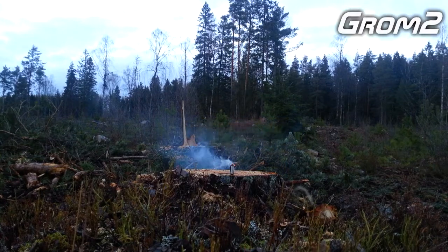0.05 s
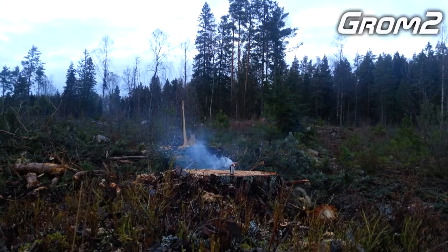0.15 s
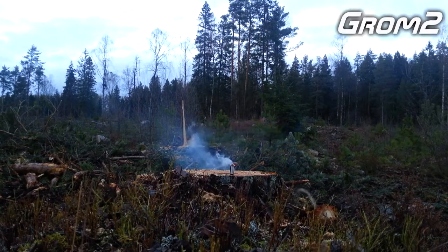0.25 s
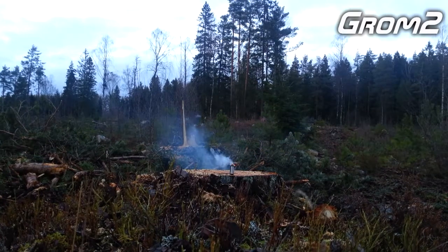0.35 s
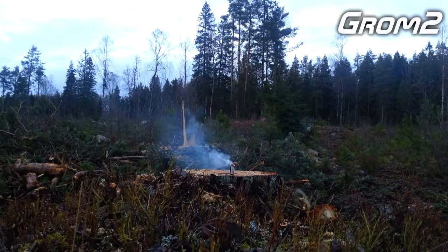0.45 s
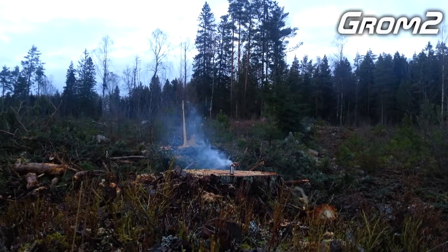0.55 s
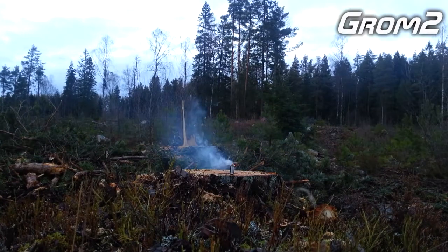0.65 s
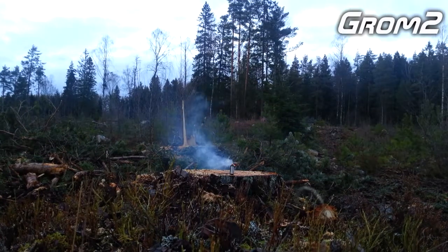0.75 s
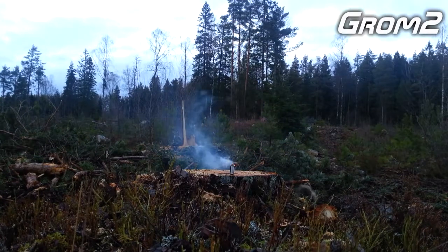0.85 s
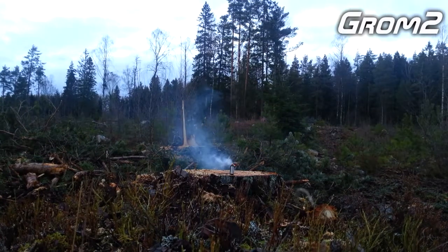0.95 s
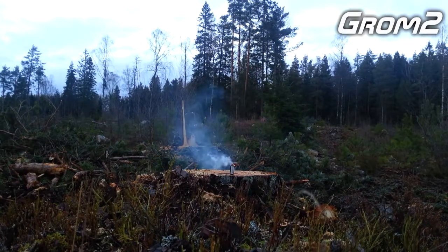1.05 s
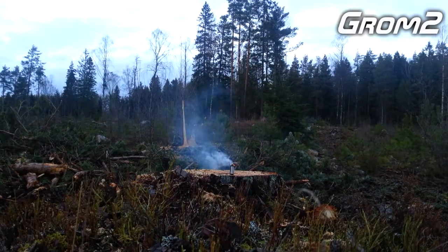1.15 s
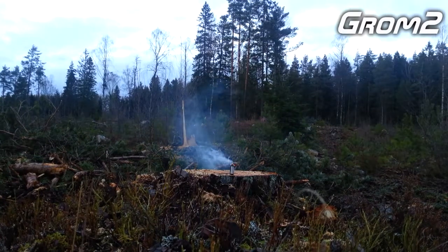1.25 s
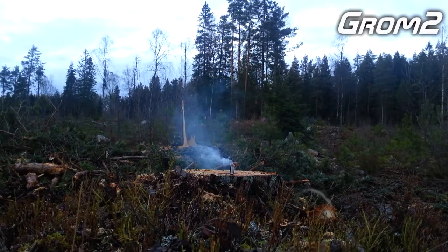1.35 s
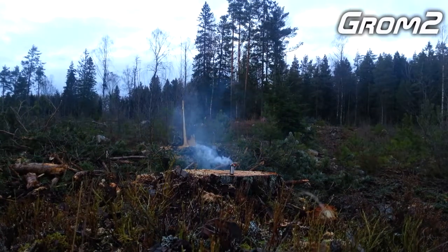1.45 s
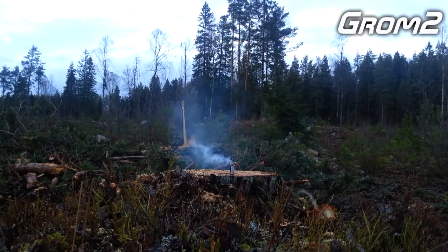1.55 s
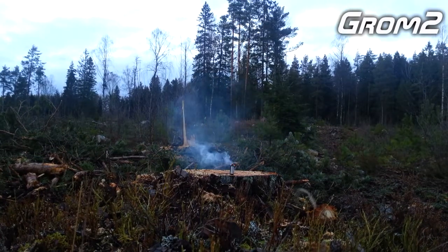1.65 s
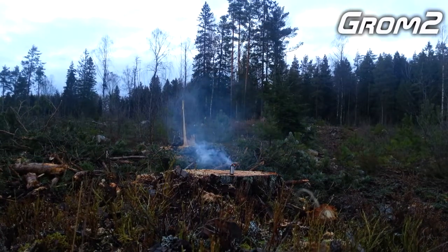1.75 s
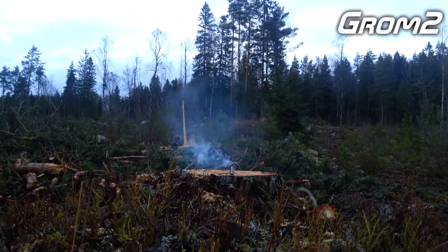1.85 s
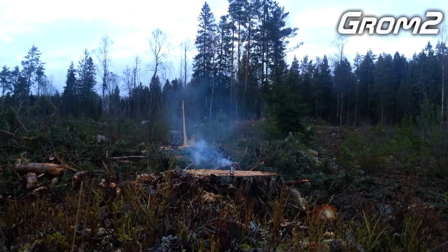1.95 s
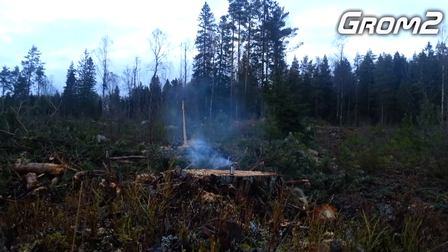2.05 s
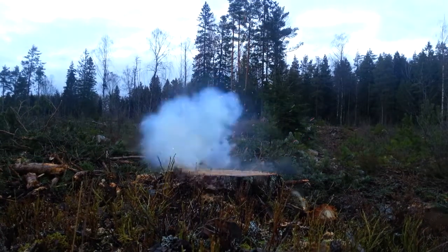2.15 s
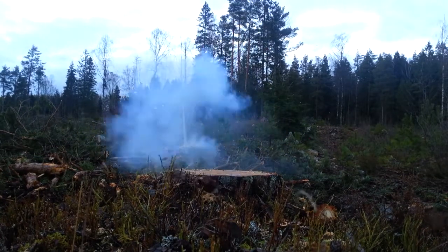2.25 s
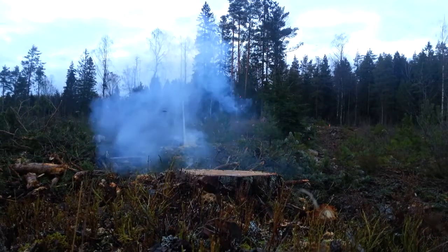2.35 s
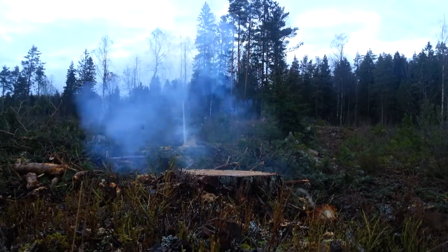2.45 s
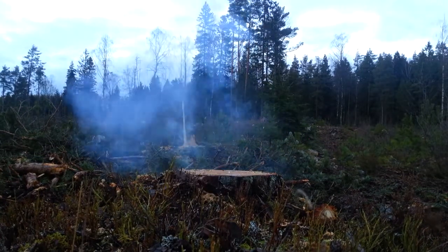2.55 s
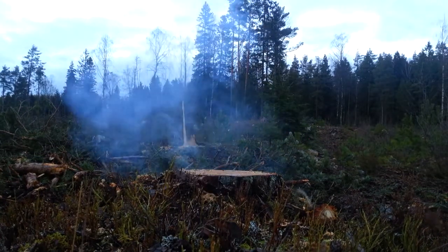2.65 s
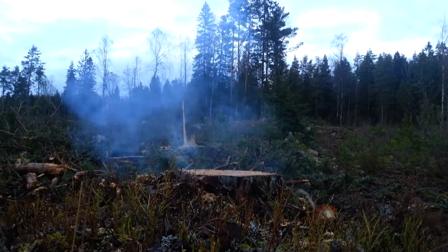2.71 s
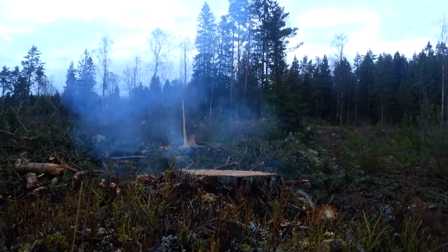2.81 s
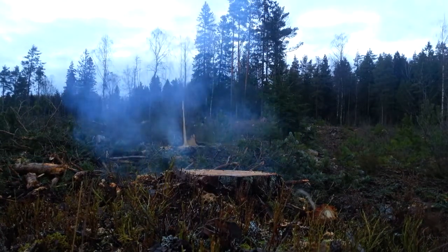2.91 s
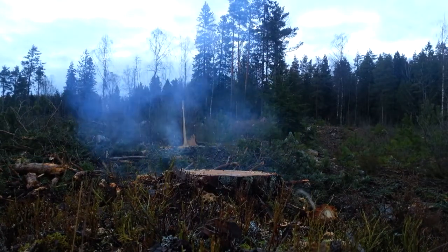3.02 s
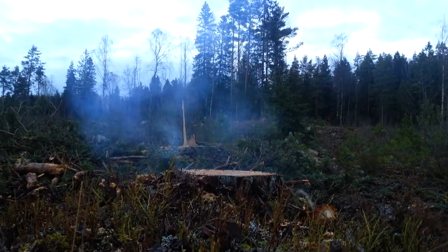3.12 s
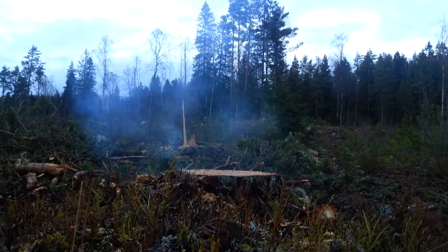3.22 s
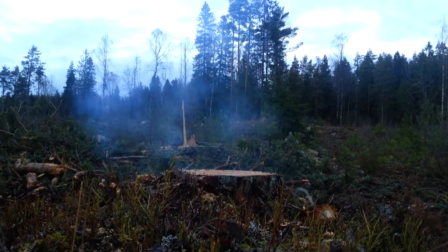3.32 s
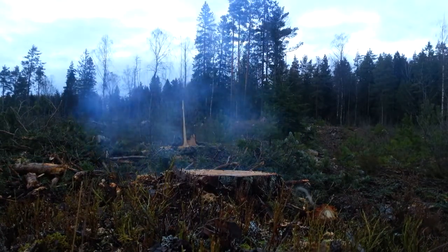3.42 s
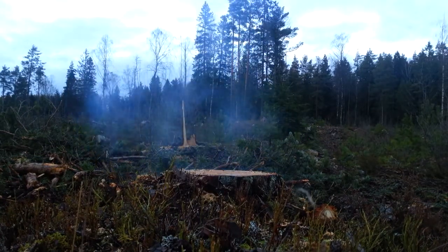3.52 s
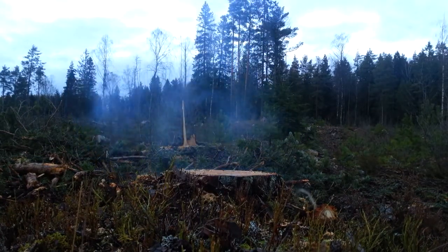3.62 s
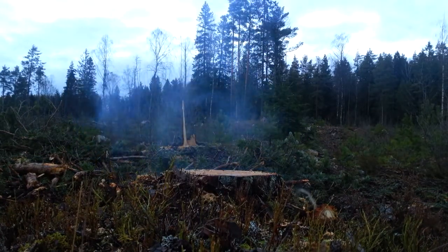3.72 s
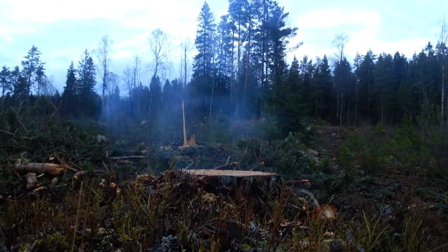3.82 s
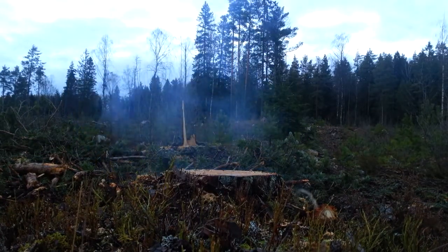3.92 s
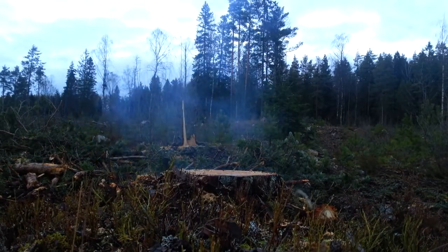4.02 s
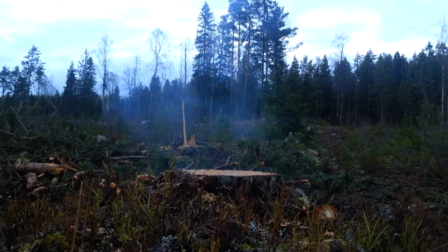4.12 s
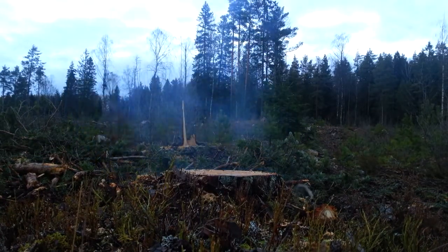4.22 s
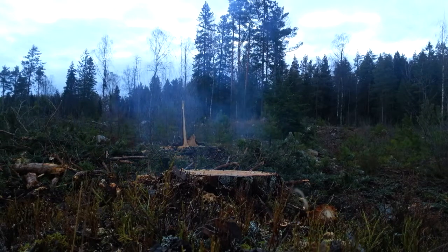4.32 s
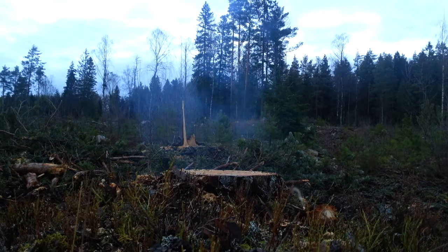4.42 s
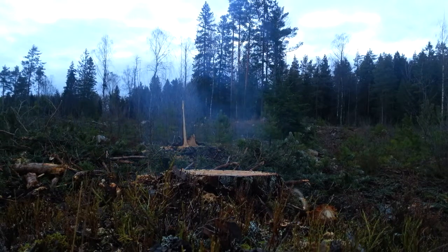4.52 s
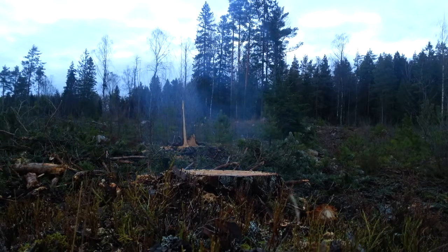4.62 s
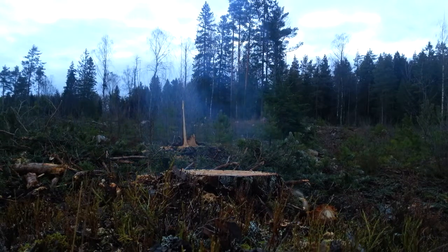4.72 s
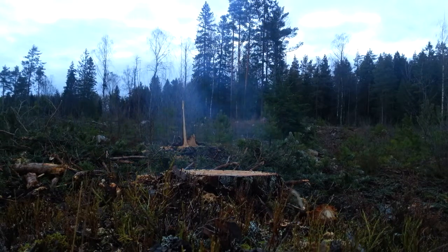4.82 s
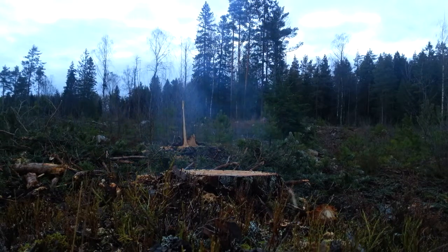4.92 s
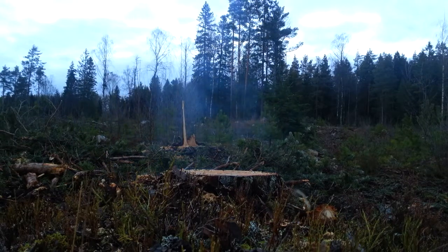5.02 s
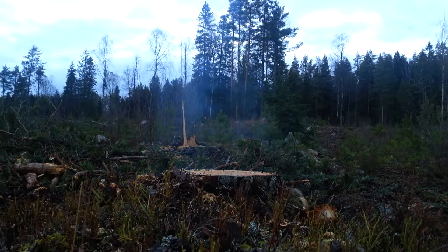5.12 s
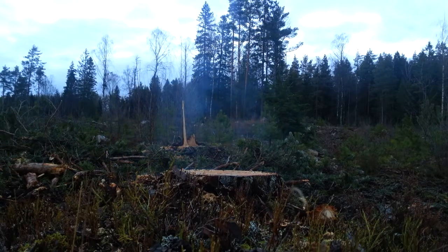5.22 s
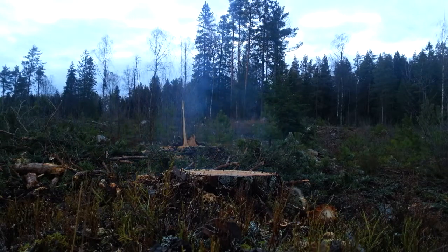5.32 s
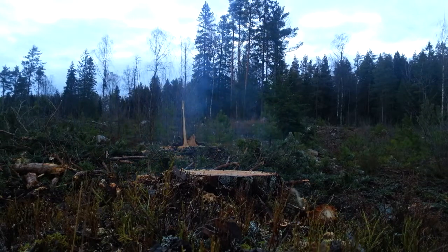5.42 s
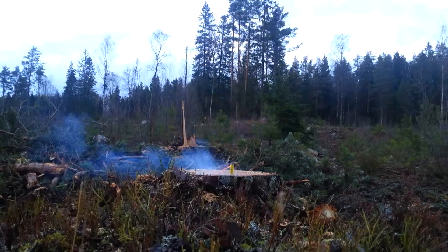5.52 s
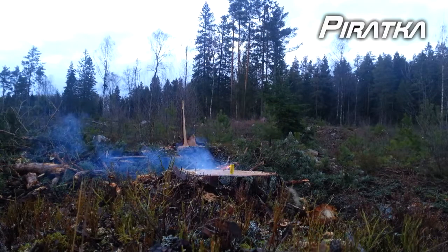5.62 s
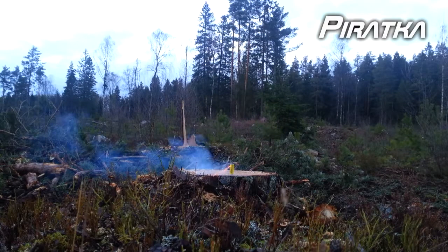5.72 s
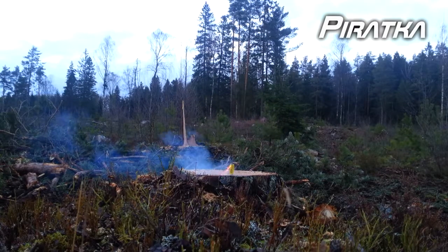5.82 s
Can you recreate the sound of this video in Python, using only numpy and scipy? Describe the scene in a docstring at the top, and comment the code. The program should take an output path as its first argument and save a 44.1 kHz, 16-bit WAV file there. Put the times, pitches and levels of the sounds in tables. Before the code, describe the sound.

A firecracker bangs with violent overload in a forest clearing, its report rolling back from the trees, then a second fuse flares up hissing.

```python
"""A firecracker goes off on a stump in a forest clearing: a shock pulse with noise bursts that overloads two microphones.
Its dull, smouldering fuse is filtered noise with spurts, heard over wind in the trees and amplifier hiss.
The report scatters off felled wood, then rolls back from the trees as noise that grows duller with travel time.
Scraps tick down as short noise bursts, and a second fuse hisses and flares as flickering noise."""
import sys
import numpy as np
from scipy import signal
from scipy.fft import rfft, irfft, next_fast_len
from scipy.io import wavfile
from scipy.ndimage import uniform_filter1d

SR = 44100
rng = np.random.default_rng(int(sys.argv[2]) if len(sys.argv) > 2 else 0)


def int16_out(signal):
    """Quantize to a 16-bit WAV file."""
    q = np.round(np.clip(np.atleast_2d(signal).T, -1, 1) * 32767)
    wavfile.write(sys.argv[1], SR, q.astype(np.int16))


N = 258426
T = np.arange(N) / SR  # time in s
BANG_S = 2.2226

# likeness of left and right in a diffuse field: frequency_hz, correlation
DIFFUSE_LIKENESS = [(60, 0.11), (140, 0.54), (290, 0.78), (640, 0.14), (1000, -0.17), (1450, -0.57),
                    (2400, 0.53), (3200, -0.1), (5000, 0.16), (8000, -0.36)]


def undb(db):
    """Level to amplitude: 20 dB is a factor of ten."""
    return 10 ** (np.asarray(db) / 20)


def at(rows, hz):
    """Piecewise-linear reading of (frequency_hz, value) rows on a log-frequency axis."""
    f, value = np.transpose(rows)
    return np.interp(np.log(hz + 1), np.log(f), value)


def unit(x):
    """Normalisation to an rms of 1."""
    return x / np.sqrt(np.mean(x ** 2))


def noise(spectrum, likeness=0, drive=1):
    """Spectral shaping of white noise, rms 1 at drive 1; the mid-to-side balance sets the channel correlation.

    The spectrum is (frequency_hz, relative_density_db) rows; likeness is one correlation or such rows.
    """
    size = next_fast_len(N + SR // 10)
    hz = np.fft.rfftfreq(size, 1 / SR)
    correlation = at(likeness, hz) if np.ndim(likeness) else likeness
    correlation = np.clip(correlation, -.98, .98)
    mid, side = rfft(drive * rng.standard_normal((2, N)), size)
    mid = mid * np.sqrt((1 + correlation) / 2)
    side = side * np.sqrt((1 - correlation) / 2)
    shape = unit(undb(at(spectrum, hz)))
    return irfft(np.array([mid + side, mid - side]) * shape, size)[:, :N]


def flicker(rate_hz, depth_db):
    """Random amplitude modulation: a gain of rms 1 gliding between random levels, rate_hz times a second."""
    steps = rng.standard_normal(N)
    return unit(undb(depth_db * np.interp(T * rate_hz, np.arange(N), steps)))


def pan(right_db):
    """Interchannel level difference, split evenly between left and right."""
    return undb(np.array([[-right_db], [right_db]]) / 2)


def bursts(rows):
    """Impulsive excitation with exponential decay, from (start_s, level_db, decay_s) rows."""
    return sum(undb(db) * (T >= s) * np.exp(-np.abs(T - s) / decay) for s, db, decay in rows)


def swells(rows, attack_s, release_s):
    """Incoherent addition of powers: (start_s, level_db, hold_s) rows each rise, hold and die away."""
    power = 0
    for s, db, hold in rows:
        rise = np.clip((T - s) / attack_s, 0, 1)
        fall = np.exp(-np.maximum(T - s - attack_s - hold, 0) / release_s)
        power = power + (undb(db) * rise * fall) ** 2
    return np.sqrt(power)


def fade(start_s, linger_s, db_per_s):
    """Reverberant-style decay: a gain that lingers near 1, then bends into a steady fall in dB."""
    age = np.maximum(T - start_s, 0)
    return undb(-db_per_s * (np.hypot(age, linger_s) - linger_s))


def forest_air():
    """Turbulence noise: a soft, far rush of wind in the trees over a low rumble that swells and sinks."""
    # distant air in the forest: frequency_hz, relative_density_db
    rush_spectrum = [(20, -23), (50, -21), (90, -10), (160, -1), (280, 0.5), (450, -1.5), (850, -0.5),
                     (1400, -4.5), (2400, -13), (4500, -20), (6200, -22), (14000, -32)]
    # the low rumble swells and sinks, Gaussian in time, lowest soon after the bang: peak_s, level_db, sigma_s
    rumble_rows = [(1.2, -49.7, 1.4), (5.15, -52, 0.53)]
    rumble_spectrum = [(20, -25), (70, -7.0), (150, 1.5), (220, -2), (400, -13), (2000, -47)]
    rush = noise(rush_spectrum, DIFFUSE_LIKENESS) * flicker(3.01, 1.0) * flicker(27, 0.32)
    rumble_level = sum(undb(db) * np.exp(-((T - s) / sigma) ** 2 / 2) for s, db, sigma in rumble_rows)
    rumble = noise(rumble_spectrum, 0.33) * flicker(11, 1.2) * rumble_level
    return rush * undb(-42) * pan(2.2) + rumble * pan(-6.5)


def fuses():
    """Jet noise of sputtering gas: the first fuse a dull smoulder, the second bright, with low puffs."""
    # the first fuse spits now and then: start_s, level_db
    spurt_rows = [(.14, -49.5), (.78, -48)]
    # the second fuse burns in flares: start_s, level_db, hold_s
    flare_rows = [(5.476, -30.5, 0.11), (5.498, -32, .002), (5.666, -27.5, 0.12)]
    # low puffs as it flares: start_s, level_db, decay_s
    puff_rows = [(5.527, -29.5, 0.0066), (5.675, -23.5, 0.01), (5.703, -30.5, 0.013), (5.732, -32, 0.01),
                 (5.771, -43, 0.024)]
    # gas jet of the second fuse: frequency_hz, relative_density_db
    jet_spectrum = [(100, -26), (300, -5.5), (550, -7), (1100, -6.5), (1700, -4.5), (2700, 0.5), (3600, -1),
                    (4800, -1.5), (6200, -9.5), (9000, -10.5), (14400, -10.5), (15200, -42.5)]
    smoulder_spectrum = [(300, -9), (1200, -2), (2500, 6), (4500, -15.0), (7000, -11), (14000, -30)]
    puff_spectrum = [(50, -20), (130, -10), (220, 1), (450, 2.5), (1000, -14), (3000, -22), (9000, -52)]

    # the first fuse dies down as it burns into the casing
    glow = undb(-53.5) * fade(0, linger_s=2, db_per_s=17)
    spurts = swells([(s, db, .02) for s, db in spurt_rows], attack_s=.025, release_s=.1)  # each held .02 s
    smoulder = noise(smoulder_spectrum, 0.65) * np.hypot(glow, spurts) * (T < BANG_S)

    flares = swells(flare_rows, attack_s=0.0018, release_s=0.11)
    jet = noise(jet_spectrum, 0.63) * flares * flicker(1500, 2) * flicker(70, .8)
    puffs = noise(puff_spectrum, 0.63) * bursts(puff_rows)
    return smoulder * pan(2.7) + (jet + puffs) * pan(3.4)


def blast(shock_db=18, push_s=0.00025):
    """Blast wave of overpressure then suction, with its crack, then boom and clatter scattered nearby."""
    # bright clatter off felled wood and brush: frequency_hz, relative_density_db
    clatter_spectrum = [(30, -38), (150, -18), (300, -13.5), (800, -16), (1400, -2.5), (2000, -0.5),
                        (2500, 2.5), (3200, -2), (4300, -5.5), (6200, -14), (10000, -21), (15000, -35)]
    # the waves in which it arrives: start_s, level_db, decay_s
    clatter_waves = [(2.2226, 8.5, 0.07), (2.372, -9.5, 0.16), (2.548, -12.5, 0.057)]
    crack_spectrum = [(500, -7), (3500, 5), (12000, -3.5)]
    boom_spectrum = [(25, -17), (130, -6.5), (280, -1), (600, -6), (1200, -13), (3000, -18.5), (9000, -30.0)]

    age = np.maximum(T - BANG_S, 0) / push_s  # in push lengths
    shock = undb(shock_db) * (T >= BANG_S) * (1 - age) * np.exp(-age)  # overpressure, then suction
    crack = noise(crack_spectrum) * bursts([(BANG_S, 24, .0006)])
    boom = noise(boom_spectrum, DIFFUSE_LIKENESS) * bursts([(BANG_S, 18, .021)])  # off the ground
    clatter = noise(clatter_spectrum, DIFFUSE_LIKENESS) * flicker(150, 3.4) * bursts(clatter_waves)
    return shock + crack + boom + clatter * pan(3.1)


def through_air(x, loss_db, power, ref_hz):
    """Frequency-dependent absorption: loss in dB grows with travel time and as frequency to this power.

    The loss at ref_hz, loss_db per second, is taken out again: that level is kept and lower ones gain.
    """
    hz, s, frames = signal.stft(x, SR, nperseg=512)
    travel_s = np.maximum(s - BANG_S, 0)
    loss = loss_db * np.outer((hz / ref_hz) ** power - 1, travel_s)
    return signal.istft(frames * undb(-loss), SR)[1][:, :N]


def forest_echo():
    """Multiple scattering: countless trunks return the report from ever further off, with swells and claps."""
    # report as it leaves the clearing: frequency_hz, relative_density_db
    report_spectrum = [(30, -46), (100, -41), (170, -23.5), (260, -8.5), (450, -4.5), (750, 1.5), (1100, 4),
                       (1700, 3.5), (2300, 4.5), (3200, 1), (4600, 0), (6200, -9), (10000, -11.5),
                       (15000, -21.5)]
    # stands of trees each return a swell: first_arrival_s, relative_level_db
    stand_rows = [(2.305, -13), (2.375, -15.5), (2.475, -17.5), (2.53, -11), (2.653, -14), (2.867, -15)]
    # sharp claps off single trunks and the forest edge: start_s, relative_level_db
    clap_rows = [(2.462, 4), (2.622, -5), (2.648, -3), (2.684, -6), (2.701, -7), (2.739, -12), (2.787, -14),
                 (2.867, -1.5), (2.8871, -3.5), (2.8972, -3), (3.056, -19)]
    ground_spectrum = [(25, -8), (150, -2.0), (300, -1), (800, -28), (3000, -50)]

    # the echo builds up over 0.86 s, lingers, then fades at a steady rate
    build = np.clip((T - BANG_S) / 0.86, 0, 1)
    depths = undb(-14) * build * fade(BANG_S, linger_s=1.074, db_per_s=16.5)
    stands = swells([(s, db, 0.038) for s, db in stand_rows], attack_s=0.019, release_s=0.11)  # held 0.038 s
    clumps = flicker(1200, 1.3) * flicker(200, 0.62) * flicker(45, 0.82)  # trunks, small groups, whole stands
    trunks = noise(report_spectrum, DIFFUSE_LIKENESS, drive=clumps * np.hypot(depths, stands)) * undb(5.0)

    # a clap at 0 dB decays in .001 s; each 5.5 dB lower, it is smeared to twice the length
    slaps = bursts([(s, db, .001 * 2 ** (-db / 5.5)) for s, db in clap_rows])
    claps = noise(report_spectrum, 0.37, drive=slaps) * undb(5.5)

    # the nearer ground adds a short, low roll
    ground = noise(ground_spectrum, .4) * bursts([(BANG_S, -21, .2)])
    return (through_air(trunks + claps, loss_db=4.0, power=1.43, ref_hz=1440) + ground) * pan(3.0)


def scraps():
    """Impact noise: bits of casing tick on dry twigs."""
    # scraps landing in the brush: start_s, level_db, decay_s
    landings = [(3.34, -47, .012), (3.572, -29, .0015), (3.611, -38, .003)]
    tick_spectrum = [(1000, -20), (4000, -4), (7500, 5), (13500, 4), (15500, -20)]
    return noise(tick_spectrum, .3) * bursts(landings) * pan(5.7)


def hiss_level():
    """Time-varying noise floor: steady, sunk by 8 dB after the bang, then back with a lift that settles."""
    return_s, rise_s, settle_s = 2.955, 0.27, 1.9
    back = np.clip((T - return_s) / rise_s, 0, 1)
    lift_db = 4.3 * np.exp(-np.maximum(T - return_s - rise_s, 0) / settle_s)
    return undb(-47.5 + (T > BANG_S) * (1 - back) * -8 + back * lift_db)


def scene():
    """Linear superposition of all that reaches the microphones."""
    return forest_air() + fuses() + blast() + forest_echo() + scraps()


def record(dry):
    """Overload: the shock stuns the right microphone for a moment; the amplifier hisses and clips hard."""
    # the right microphone is stunned by the shock: start_s, end_s
    stun = (2.2239, 2.3525)
    # its bias jolts as it sticks and frees itself: start_s, jump_full_scales (before smoothing), leak_s
    jolts = [(2.2242, -3.5, 0.0012), (2.232, -2.5, .001), (2.2332, 6, .0011), (2.348, -3.5, 0.001),
             (2.3489, 6, 0.00087), (2.3531, -3, 0.001)]
    # microphone hiss: frequency_hz, relative_density_db
    hiss_spectrum = [(100, -12), (1500, -2.5), (4500, 0.5), (6200, -9), (7600, -2.5), (10000, -1.5),
                     (14400, -1.5), (14900, -40), (15300, -60)]

    deaf = uniform_filter1d(1. * ((T > stun[0]) & (T < stun[1])), size=40)
    # each jolt of the bias leaks away through the coupling capacitor as a thump
    thumps = sum(jump * bursts([(s, 0, leak)]) for s, jump, leak in jolts)
    thumps = uniform_filter1d(thumps, size=16)
    ports = np.array([dry[0], dry[1] * (1 - deaf) + thumps])
    hiss = noise(hiss_spectrum) * hiss_level() * pan(4.3)
    clipped = np.clip(ports + hiss, -.98, .98)
    low_pass = signal.firwin(255, 15800, fs=SR)  # cutoff in Hz
    return signal.fftconvolve(clipped, low_pass[None], "same", axes=1)


dry = scene()
out = record(dry)
int16_out(out)
```